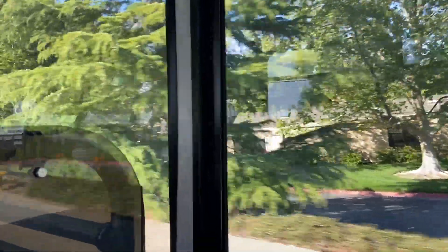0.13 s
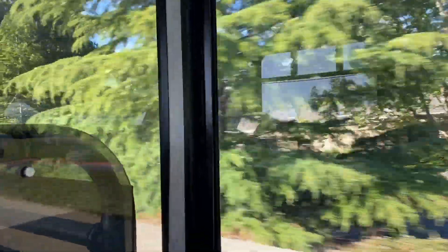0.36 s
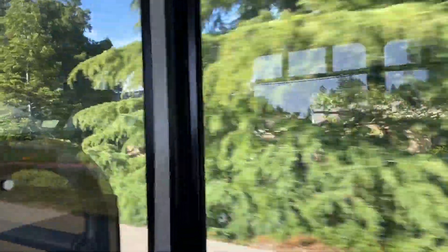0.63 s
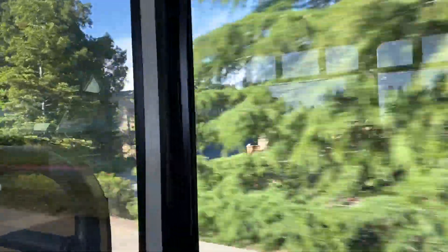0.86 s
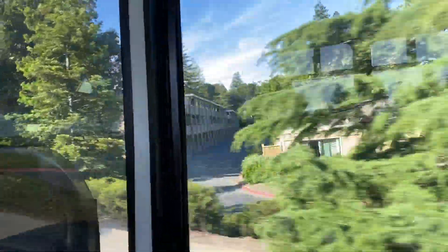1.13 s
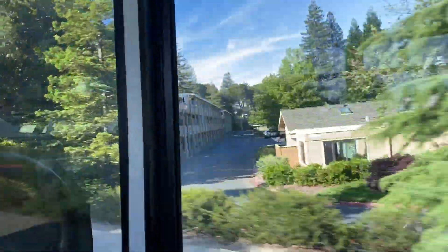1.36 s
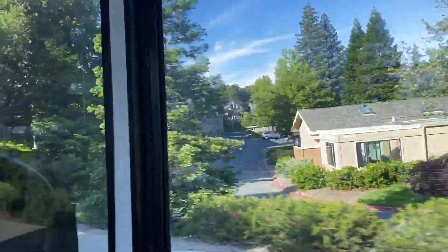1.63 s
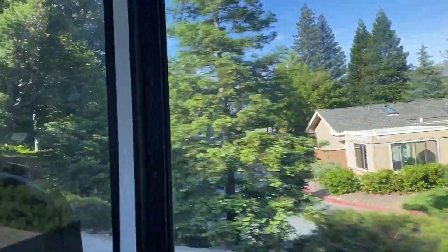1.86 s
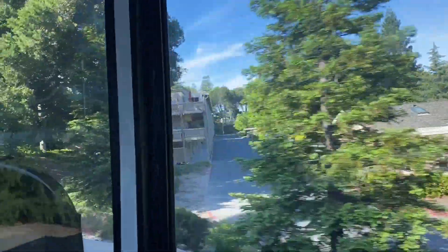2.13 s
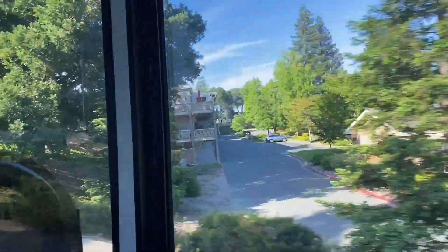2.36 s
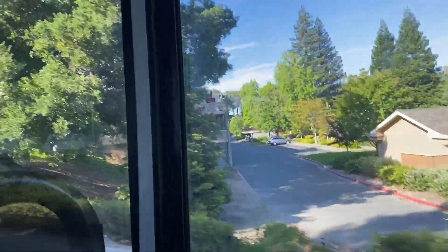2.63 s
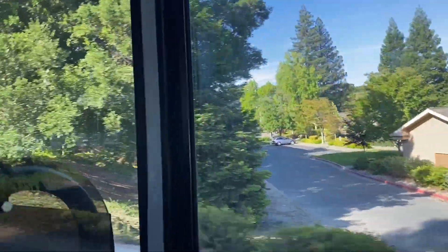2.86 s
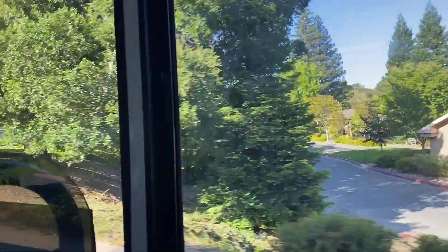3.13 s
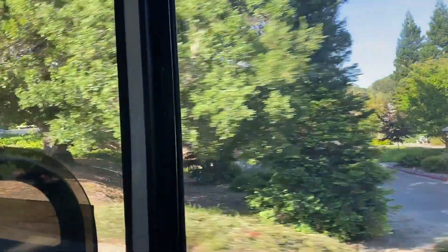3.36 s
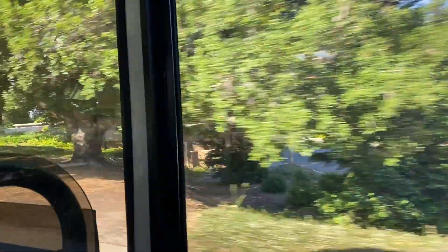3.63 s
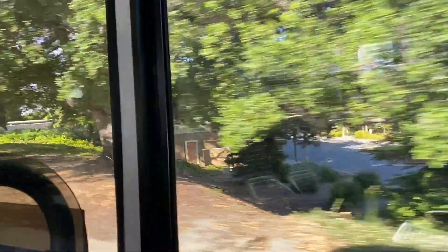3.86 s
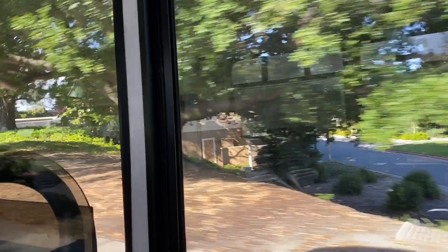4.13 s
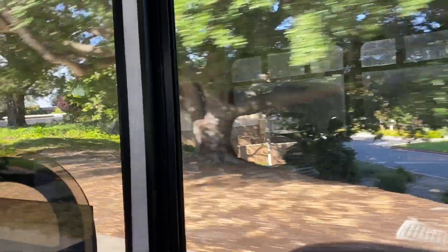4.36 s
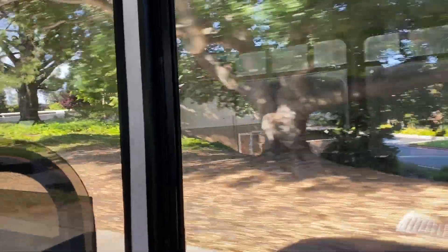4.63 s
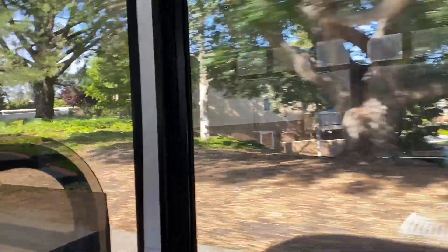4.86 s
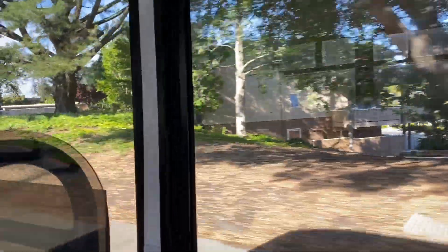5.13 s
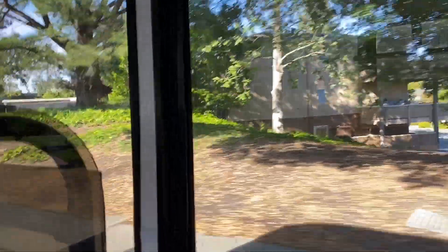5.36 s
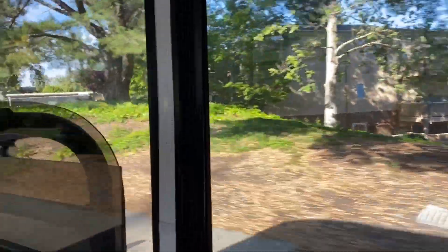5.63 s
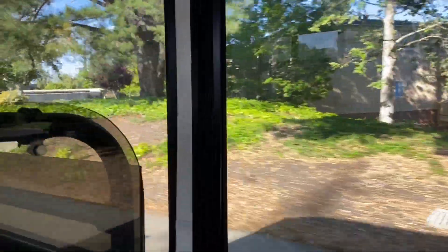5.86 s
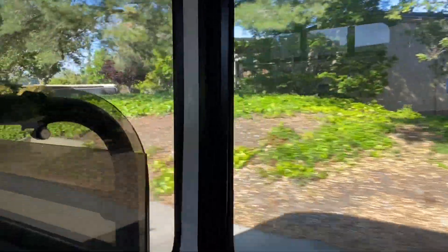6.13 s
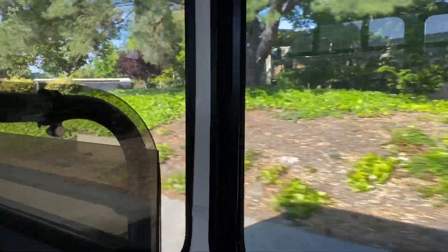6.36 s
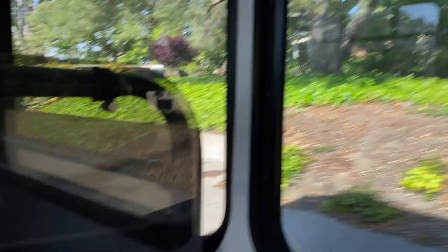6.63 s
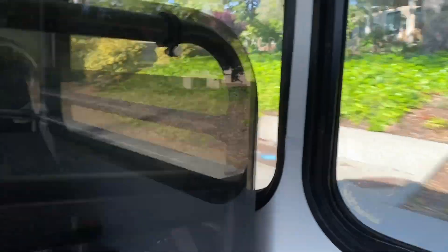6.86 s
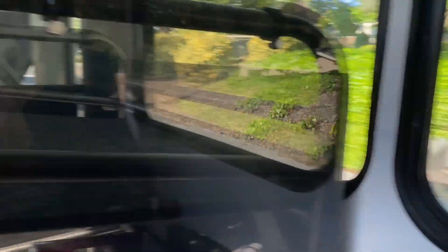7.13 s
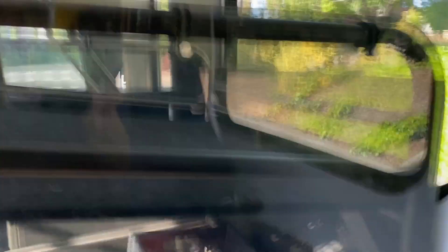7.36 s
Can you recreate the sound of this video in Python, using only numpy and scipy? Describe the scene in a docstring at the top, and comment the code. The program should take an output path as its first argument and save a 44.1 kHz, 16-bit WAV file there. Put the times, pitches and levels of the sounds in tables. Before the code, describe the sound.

Heard inside a small bus rolling slowly along a street. A low engine drone and bassy body boom dominate, with muffled tyre roar above. Loose panels rattle in a busy cluster between one and two seconds, then quieten. A hard latch clack strikes at about five seconds, followed by scattered knocks and ticks. Close stereo microphone in the cabin.

```python
"""Inside a small bus rolling slowly along a street.
The engine drones and the body shudders as wavering tones; shaped noise makes boom, growl and tyre roar.
Loose panels knock as dying noise with ringing modes; rail, bracket, latch and door ring when struck.
Latches tick in short high noise, and trim buzzes as clumped grains over hiss as the road shakes it.
A close pair of microphone ports hears it all, the right one sharing part of the left one's sound."""
import sys
import numpy as np
from scipy import signal
from scipy.fft import rfft, irfft
from scipy.io import wavfile

SR = 44100
rng = np.random.default_rng(int(sys.argv[2]) if len(sys.argv) > 2 else 0)


def level_to_linear(level):
    """Convert decibel levels to linear amplitude factors, elementwise."""
    exponent = np.asarray(level, float) / 20
    return 10 ** exponent


def log_audio(samples):
    """Write samples as a 16-bit WAV file to the path given in sys.argv[1]."""
    # one column per channel
    frames = np.atleast_2d(samples).T
    # limit to full scale, then quantise
    limited = np.clip(frames, -1, 1)
    pcm = np.round(limited * 32767).astype(np.int16)
    wavfile.write(sys.argv[1], SR, pcm)


N = 330309
HZ = np.fft.rfftfreq(N, 1 / SR)
TIME_S = np.arange(N) / SR

# how hard the trim is shaken: time_s [s], level_db [dB]
SHAKE_CURVE = [(0.0, -54.5), (0.42, -56.5), (0.6, -51), (0.95, -54.5), (1.14, -54.5), (1.175, -49),
               (1.27, -47), (1.96, -51), (2.2, -53), (3.36, -55), (3.9, -57), (4.51, -58), (4.75, -47.5),
               (5.25, -50.5), (6.01, -49), (6.3, -54.5), (6.65, -51), (6.99, -56), (7.2, -47.5),
               (7.49, -49.5)]
# spectrum of loose parts rattling: pitch_hz [Hz], density_db [dB per Hz, relative]
RATTLE_SPECTRUM = [(500, -8.5), (1000, -11.5), (2200, -1), (4000, -1.5), (7000, -6.5), (10000, -11),
                   (13000, -14.5), (15000, -14.5), (16500, -23.5)]
EDGE_ABOVE_HZ = 8000   # the hard top of buzz and knocks


def engine():
    """The firing tone booms in the cabin, with two faint overtones."""
    # drone, sagging unevenly, then rising at the end: time_s [s], firing_hz [Hz], level_db [dB]
    drone = [(1.3, 72.77, -30), (1.41, 73.3, -20.5), (1.6, 72.6, -20), (1.82, 68.9, -23.5),
             (2.12, 65.2, -16), (2.4, 66.6, -16.5), (2.77, 68.2, -22), (3.07, 65.33, -17.5),
             (3.33, 65.1, -16.5), (3.375, 65.3, -27), (3.42, 65.3, -16), (3.89, 65.42, -16.5),
             (4.41, 63.3, -17), (5.28, 62.0, -18.5), (5.95, 60, -20), (6.13, 58.25, -28), (6.4, 58.5, -28),
             (6.88, 59.16, -22.5), (7.08, 59.4, -19.5), (7.2, 59.7, -24.5), (7.4, 71, -29)]
    # overtones: multiple [of the firing tone], level_db [dB re the firing tone]
    overtones = [(2, -20), (3, -34.5)]
    return steady_tone(drone, overtones, waver_hz=0.3, waver_db=0.0)


def body_shudder():
    """A low shudder tone of the body, near 58 Hz, before and under the drone's start."""
    # shudder: time_s [s], pitch_hz [Hz], level_db [dB]
    shudder = [(0.75, 58.7, -34), (0.852, 59, -25), (0.882, 57.7, -43), (1.124, 57.6, -25.5),
               (1.374, 55.9, -41), (1.802, 61.2, -37), (1.95, 60.5, -30.5)]
    return steady_tone(shudder, [], waver_hz=0.97, waver_db=3.5)


def steady_tone(rows, overtones, waver_hz, waver_db):
    """A tone with overtones, its pitch and level drifting a little; it fades outside its table."""
    hz, level_db = in_time(rows)
    inside_s = np.minimum(TIME_S - rows[0][0], rows[-1][0] - TIME_S)
    fade = np.clip(inside_s / 0.035 + 1, 0, 1)
    phase = 2 * np.pi * np.cumsum(hz + waver_hz * drift(3.1)) / SR
    tone = np.sin(phase)
    for multiple, db in overtones:
        tone = tone + level_to_linear(db + 1.9 * drift(1.2)) * np.sin(multiple * phase)
    return np.sqrt(2) * fade * level_to_linear(level_db + waver_db * drift(1.4)) * tone


def road():
    """Bumps boom in the body's low modes; the floor pan growls and the tyres roar above."""
    # the suspension heaves: time_s [s], lowest_boom_db [dB]
    heave = [(0.0, -37), (0.54, -19.5), (0.9, -33.5), (1.58, -17.5), (1.77, -23), (1.94, -21), (2.61, -33),
             (3.4, -23.5), (4.2, -25.5), (4.45, -23.5), (5.4, -22), (5.9, -26.5), (7.3, -25.5)]
    # how hard the road works the body: time_s [s], upper_boom_db [dB]
    body_work = [(0.0, -23), (0.83, -21), (1.1, -25), (1.95, -20.5), (2.15, -24.5), (2.63, -23.5),
                 (3.3, -24), (3.75, -25), (4.75, -24), (5.13, -22.5), (5.92, -23.5), (6.65, -20.5),
                 (6.84, -26.5), (7.49, -22)]
    # rolling noise at mean shake, the roar quietening as the bus slows:
    # time_s [s], tyre_roar_db [dB], floor_pan_growl_db [dB]
    rolling = [(0, -39, -42), (0.5, -40, -42), (1.5, -41, -43), (2.6, -41.5, -43), (3.6, -41.5, -41.5),
               (4.5, -41.5, -40.5), (5.6, -43, -41.5), (6.5, -43, -41.5), (7.49, -44, -41)]
    # boom and roar spectra: pitch_hz [Hz], density_db [dB per Hz, relative]
    boom_spectrum = [(20, -23), (30, -4), (40, -9), (48, -1), (57, 1), (80, 3), (104, 0.5), (135, -6),
                     (170, -12), (215, -14.5), (300, -63)]
    roar_spectrum = [(100, -53), (180, -5.5), (250, -1.5), (320, -1.5), (450, -7.5), (700, -8.5),
                     (1200, -15.5), (2200, -20), (3500, -30.5), (7000, -38.5), (12000, -41.5), (16500, -57)]
    # resonances of the body: pitch_hz [Hz], half_width_hz [Hz], lift_db [dB]
    body_modes = [(35, 3.8, 7.5), (52.7, 9, 8.5), (65, 5, -2.5), (80.5, 3.3, 3.5), (96, 2.3, 4.5),
                  (106, 4.8, 4.5), (119, 4, -4), (132.3, 8, 5), (157.7, 7.4, 7.5), (169, 4, -3.5),
                  (185, 10, 3), (224, 5.6, 3), (236, 7.4, -2), (263, 6.4, 1.5), (297.8, 9.4, 4.5),
                  (390, 20, 2.5), (400, 12, -1.5), (449, 10, 4.5)]
    # the floor pan booms over dips in the road: centre_s [s], rise_db [dB]
    dips = [(1.15, 3), (1.5, 4), (2.0, 7), (5.0, 2), (5.4, 6), (5.92, 2.5), (6.65, 2), (7.1, 8),
            (7.27, 7.5), (7.49, 6)]
    dip_half_s = 0.053
    roar_follows, growl_follows = 0.35, 0.2   # shares of the shake's swing

    low_db, = in_time(heave)
    upper_db, = in_time(body_work)
    roar_db, growl_db = in_time(rolling)
    lift_db = sum(db / (1 + ((HZ - hz) / half_width) ** 2) for hz, half_width, db in body_modes)
    low, upper = split(coloured(rng.standard_normal((2, N)), at_hz(boom_spectrum) + lift_db), hz=62)
    growl, roar = split(coloured(rng.standard_normal((2, N)), at_hz(roar_spectrum) + lift_db), hz=363)
    boom = level_to_linear(low_db) * low + level_to_linear(upper_db + 0.83 * drift(3.1)) * upper

    dips_db = sum(db * np.exp(-((TIME_S - s) / dip_half_s) ** 2) for s, db in dips)
    growl_db = growl_db + growl_follows * shake_swing() + dips_db + 1.6 * drift(15.6)   # lumpy
    roar_db = roar_db + roar_follows * shake_swing() + 1.1 * drift(6.1)
    return boom + level_to_linear(growl_db) * rms_one(growl) + level_to_linear(roar_db) * rms_one(roar)


def knocks(chatter_per_s=1300):
    """A crack and a wash dying in the cabin; the panel chatters on, sounding its modes."""
    # loose panels knock: start_s [s], strike_db [dB], thud_db [weight, dB re strike],
    # decay_s [s to fall 60 dB, before the scaling of wash and chatter below]
    panel_knocks = [(0.399, -43.5, -1, 1), (0.8356, -46, -5, 0.2), (1.046, -34.5, -11, 0.36),
                    (1.1601, -36, 2, 0.73), (1.2098, -35.5, -5.5, 0.43), (1.234, -39, -1, 0.28),
                    (1.275, -44, -2, 0.26), (1.338, -39.5, 5.5, 0.33), (1.358, -42, 3, 0.25),
                    (1.413, -41.5, 11, 0.36), (1.4449, -39.5, 8.5, 0.37), (1.5709, -44, 5, 0.2),
                    (1.626, -47.5, 20.5, 0.38), (1.64, -35, -3, 0.45), (1.6465, -36, 3, 0.37),
                    (1.655, -34, 0.5, 0.48), (1.676, -44, -2, 0.37), (1.697, -52, -1, 0.4),
                    (1.8893, -36, 8, 0.47), (1.8943, -37, 4.5, 0.25), (1.907, -40, 7, 0.6),
                    (1.92, -46, 5, 0.34), (1.937, -46, 8, 0.4), (1.955, -46, 6, 0.4), (1.98, -48, 4, 0.3),
                    (2.039, -34.5, 1.5, 0.35), (2.056, -40, -2, 0.27), (2.088, -53, -1, 0.27),
                    (2.1755, -46, -20, 0.11), (2.3773, -43, 6, 0.4), (2.4835, -43.5, 5, 1),
                    (2.9117, -41, -1.5, 0.79), (3.447, -42.5, 2, 1), (4.007, -41.5, -2, 0.59),
                    (4.2544, -46.5, -9, 0.35), (4.475, -43.5, 1.5, 0.96), (4.607, -37, -2, 0.31),
                    (4.94, -38.5, 3, 0.36), (4.9958, -26.5, -10, 0.33), (5.011, -33.5, -0.5, 0.29),
                    (5.024, -49, -2, 0.4), (5.04, -44.5, 4, 0.5), (5.055, -49, 6, 0.3),
                    (5.085, -51, 3, 0.3), (5.105, -53, 4, 0.2), (5.1482, -41, 4.5, 0.33),
                    (5.243, -40, -6, 0.32), (5.469, -39.5, 1.5, 0.73), (5.727, -38.5, -14, 0.2),
                    (5.824, -46.5, -17, 0.38), (6.5934, -35, -0.5, 0.39), (6.615, -43, 4, 0.4),
                    (6.7509, -42, 1, 0.15), (6.951, -44, 5, 0.37), (6.9845, -43, -5, 0.463),
                    (7.045, -38.5, 3.5, 0.36), (7.2041, -43, -5, 0.51), (7.464, -44, 11.5, 0.3)]
    # panel resonances: pitch_hz [Hz], level_db [dB], t60_s [s]
    panel_modes = [(542, -1, 0.13), (861, 2.5, 0.067), (960, -9.5, 0.097), (1095, -3.5, 0.072),
                   (1140, -3.5, 0.047), (1765, 3, 0.039), (1990, -2.5, 0.042), (2320, 1.5, 0.045),
                   (2630, -3.5, 0.055), (3740, -12, 0.04), (4390, -6.5, 0.065), (5170, -4, 0.048),
                   (6370, -8, 0.03), (6900, -5, 0.032)]
    thud_below_hz, clatter_below_hz = 1400, 2900
    clatter_offset_db, clatter_follows = -6.5, 1   # middle band re strike; share of the weight
    edge_offset_db, edge_top_db = -16, -45.5   # hard edge re strike; its ceiling before the crack

    s, strike_db, thud_db, decay_s = np.transpose(panel_knocks)
    clatter_db = clatter_offset_db + clatter_follows * thud_db
    at = np.round(s * SR).astype(int)
    sputter = level_to_linear(1.5 * drift(120))   # the wash dies unevenly
    noise = coloured(sputter * rng.standard_normal((2, N)), at_hz(RATTLE_SPECTRUM))
    thud, noise = split(noise, thud_below_hz)
    clatter, noise = split(noise, clatter_below_hz)
    bright, edge = split(noise, EDGE_ABOVE_HZ)

    hardness_db = -.6 * thud_db   # blows with little thud are hard contacts and crack more

    def burst(level_db, crack_db, wash_db, smooth):
        """Crack plus wash; heavy parts take longer to swell."""
        crack = dying(at, level_to_linear(level_db + crack_db + hardness_db), .035 + 0 * s)
        wash = dying(at, level_to_linear(level_db + wash_db), 1.25 * decay_s)
        return signal.lfilter([smooth], [1, smooth - 1], crack + wash)

    out = burst(strike_db + thud_db, -28, -11.5, .006) * rms_one(thud)
    out += burst(strike_db + clatter_db, -10, -11, .03) * rms_one(clatter)
    out += burst(strike_db, -14.5, -12, .04) * rms_one(bright)
    edge_db = np.minimum(strike_db + edge_offset_db, edge_top_db)
    out += burst(edge_db, 0.82, 0, .1) * rms_one(edge)

    # chance touches after each blow drive the panel's modes
    touches = 0.52 * (rng.random(N) < chatter_per_s / SR)
    touches[at] = 0.16
    strengths_db = rng.normal(0, 2.5, (len(at), len(panel_modes)))
    for k, (hz, level_db, t60) in enumerate(panel_modes):
        part_db = thud_db if hz < thud_below_hz else clatter_db if hz < clatter_below_hz else 0
        force_db = strike_db + part_db + level_db - 13.5 + strengths_db[:, k]
        force = touches * dying(at, level_to_linear(force_db), 0.82 * decay_s)
        out += ring(force * rng.choice([-1, 1], (2, N)), hz, t60)
    return out


def fittings():
    """Thin lasting rail tones, hollow bracket taps, the hard clack of the latch, the door's thumps."""
    # blows: start_s [s], level_db [dB]; modes: pitch_hz [Hz], level_db [dB], t60_s [s]
    # a hand rail rings after some jolts
    rail_blows = [(1.645, -47), (1.899, -55)]
    rail_modes = [(3295, 0, .6), (3526, -5, .5)]
    # a bracket taps
    bracket_taps = [(1.2125, -35), (1.648, -34), (1.6535, -36), (2.04, -39), (7.468, -42), (7.478, -42)]
    bracket_modes = [(1814, 0, .04), (3640, -5, .03)]
    # the door latch clacks and bounces
    latch_clacks = [(4.9958, -36), (4.998, -38), (5.0005, -39), (5.013, -48), (5.022, -50), (5.043, -47),
                    (5.052, -50), (6.595, -48), (6.6, -51), (6.607, -51), (6.62, -52)]
    latch_modes = [(2260, 1, 0.03), (2837, -1, .022), (3300, -4, .018), (3700, -1, .022), (4040, -3, .02),
                   (4400, 2, 0.03), (5098, -3, .02), (5760, 0, .018), (6527, -2, .02), (7400, -5, .015)]
    # the door leaf thumps in its frame
    door_thumps = [(1.64, -41), (1.648, -39), (1.66, -41), (1.677, -43), (1.705, -44), (1.8895, -37),
                   (1.9, -39), (1.912, -40), (1.93, -41), (1.945, -42), (1.962, -42), (4.999, -36),
                   (5.008, -39), (5.021, -39), (5.032, -39)]
    door_modes = [(420, 1, 0.12), (572, -1, 0.044), (852, -5, 0.045), (996, 0.5, 0.059), (1064, -7, 0.033),
                  (2580, -7, 0.04)]
    rail = struck(rail_blows, rail_modes, spread_db=1)
    bracket = struck(bracket_taps, bracket_modes, spread_db=1.5)
    latch = struck(latch_clacks, latch_modes, spread_db=1)
    door = struck(door_thumps, door_modes, spread_db=1.5)
    return rail + bracket + latch + door


def struck(blows, modes, spread_db):
    """Each blow sets every mode of one object ringing, a little differently each time."""
    s, blow_db = np.transpose(blows)
    at = np.round(s * SR).astype(int)
    chance_db = spread_db * rng.standard_normal((len(s), len(modes)))
    out = 0
    for k, (hz, level_db, t60) in enumerate(modes):
        clicks = np.zeros(N)
        clicks[at] = level_to_linear(blow_db + level_db + chance_db[:, k]) * (-1) ** k
        out = out + ring(clicks, hz, t60)
    return out


def ticks():
    """Hard little contacts: milliseconds of high noise with a faint tail; shaking brings more of them."""
    # single latch ticks, loud to faint: start_s [s], level_db [dB]
    placed_ticks = [(0.3975, -49), (0.477, -38.5), (0.596, -40), (0.7118, -45), (0.8335, -43), (1.146, -42),
                    (1.214, -38), (1.3385, -46), (1.418, -47), (1.4446, -41), (1.519, -42), (1.765, -48),
                    (1.795, -43), (1.822, -39), (1.8956, -39), (2.0398, -42), (2.377, -46), (2.6702, -40.5),
                    (2.911, -43), (3.353, -43.5), (3.461, -41), (4.5939, -43), (4.6064, -35), (4.664, -48),
                    (4.758, -47), (4.8254, -44), (4.9944, -32.5), (5.1682, -43), (5.242, -43),
                    (5.3935, -51), (5.4663, -49), (5.609, -43), (5.692, -41), (5.7269, -47), (5.823, -53),
                    (5.911, -48), (5.9786, -61), (6.7506, -46), (6.78, -48), (6.9526, -47), (6.972, -52),
                    (7.0095, -45), (7.048, -43)]
    centre_hz, width_hz, t60_s = 12200, 6000, 0.01
    chance_per_s, chance_db, chance_spread_db = 6.0, -51, 2.0   # rate at mean shake

    s, level_db = np.transpose(placed_ticks)
    chance_at = np.flatnonzero(rng.random(N) < chance_per_s * level_to_linear(shake_swing()) / SR)
    at = np.append(np.round(s * SR).astype(int), chance_at)
    level_db = np.append(level_db, chance_db + chance_spread_db * rng.standard_normal(len(chance_at)))
    contact = dying(at, level_to_linear(level_db), t60_s + 0 * level_db)
    tail = dying(at, level_to_linear(level_db - 11.0), 0.15 + 0 * level_db)
    shape_db = -10 * np.log10(1 + ((HZ - centre_hz) / width_hz * 2) ** 4)
    return (contact + tail) * coloured(rng.standard_normal((2, N)), shape_db)


def buzz(per_s=900, spread_db=3.0):
    """Dense tiny contacts in clumps, over the hiss that the cabin smears them into."""
    level_db, = in_time(SHAKE_CURVE)
    sizzle_db = -66 + shake_swing()   # the top follows the whole swing of the shake
    clumps = level_to_linear(5.0 * drift(12.0))
    born = rng.random(N) < per_s * clumps / SR
    sizes = level_to_linear(spread_db * np.minimum(rng.exponential(1, N), 5))
    grains = signal.lfilter([1], [1, -.97], born * sizes)
    envelope = .5 * rms_one(grains) + level_to_linear(1.8 * drift(38.0))
    noise = coloured(envelope * rng.standard_normal((2, N)), at_hz(RATTLE_SPECTRUM))
    body, top = split(noise, EDGE_ABOVE_HZ)
    return level_to_linear(level_db) * body + level_to_linear(sizzle_db + 7.7 * drift(5.9)) * rms_one(top)


def shake_swing():
    """The shake in dB about its mean."""
    level_db, = in_time(SHAKE_CURVE)
    return level_db - level_db.mean()


def rms_one(x):
    """Scale to rms 1."""
    return x / np.sqrt(np.mean(x ** 2) + 1e-20)


def in_time(rows):
    """Columns of a curve table at every sample."""
    s, *columns = np.transpose(rows)
    return [np.interp(TIME_S, s, c) for c in columns]


def at_hz(points):
    """A spectrum table on the frequency grid, joined on a log axis."""
    hz, value = np.transpose(points)
    return np.interp(np.log(HZ + 1), np.log(hz), value)


def drift(rate_hz):
    """Slow chance with spread 1: noise through two equal low-pass poles, made at every 40th sample."""
    r = np.exp(-80 * np.pi * rate_hz / SR)
    noise = rng.standard_normal(N // 40 + 2002)
    slow = signal.lfilter([1], [1, -2 * r, r * r], noise)[2000:]   # drop the filter's start
    return np.interp(np.arange(N) / 40, np.arange(len(slow)), rms_one(slow))


def coloured(x, level_db):
    """Two signals through one spectrum; rms 1."""
    return rms_one(irfft(rfft(x) * level_to_linear(level_db), N))


def split(x, hz):
    """The parts below and above a frequency."""
    low = irfft(rfft(x) / (1 + (HZ / hz) ** 6), N)
    return low, x - low


def ring(clicks, hz, t60):
    """A unit click sets a sine of starting height 1 ringing in a two-pole resonator."""
    r, w = level_to_linear(-60 / (t60 * SR)), 2 * np.pi * hz / SR
    return signal.lfilter([0, np.sin(w)], [1, -2 * r * np.cos(w), r * r], clicks + 1e-18)


def dying(at, peaks, t60s):
    """An envelope that jumps at each sample index and dies away; overlapping powers add."""
    power = np.zeros(N)
    for start, peak, t60 in zip(at, peaks, t60s):
        age = np.arange(min(N - start, int(t60 * SR) + 1)) / SR
        power[start:start + len(age)] += peak ** 2 * level_to_linear(-120 * age / max(t60, .002))
    return np.sqrt(power)


def scene():
    """Row 0 is the left port; row 1 a second path: separate noise, the same struck fittings, no tones."""
    left_only = [[1], [0]]
    tones = (engine() + body_shudder()) * left_only
    return tones + road() + knocks() + fittings() + ticks() + buzz()


def low_pass(x):
    """Removes everything above the highest recorded frequency."""
    return signal.sosfilt(signal.butter(12, 16490, fs=SR, output="sos"), x)


def record(dry):
    """The right port shares part of the left one's sound, turned in phase; the rest is the second path."""
    # likeness of the ports: pitch_hz [Hz], likeness [0-1]
    likeness = [(25, .995), (90, 0.97), (135, 0.89), (170, 1), (215, 0.32), (270, 0.65), (345, 0.73),
                (550, 0.53), (750, 0.068), (1800, 0.031), (2600, 0.66), (5800, 0.32), (6900, 0.64),
                (8200, 1.0)]
    # level between the ports: pitch_hz [Hz], left_over_right_db [dB]
    tilt = [(25, -.5), (64, -1.1), (135, -2.2), (215, -.4), (320, 1.2), (440, -1), (560, 1.2), (1400, -.8),
            (3000, 1.5), (5000, 1.5), (7000, 0)]
    # phase between the ports, before the turn below: pitch_hz [Hz], right_leads_rad [radians]
    phase_lead = [(25, 0.38), (66, 0.17), (110, 0.24), (220, -0.2), (1000, -1.38), (4700, -0.55),
                  (6900, -0.22)]
    turn_from_hz, turn_every_hz = 6780, 4250   # above this the lead grows, one full turn per step
    staircase_rad = 0.11   # flattens the growing phase at each half turn

    near, other = rfft(dry) / (1 + (HZ / 15200) ** 60)   # steep top end
    alike = np.clip(at_hz(likeness), 0, 1)
    turn = 2 * np.pi * np.maximum(HZ - turn_from_hz, 0) / turn_every_hz
    lead = at_hz(phase_lead) + turn - staircase_rad * np.sin(2 * turn)
    right = alike * near * np.exp(1j * lead) + np.sqrt(1 - alike ** 2) * other
    half_tilt = np.sqrt(level_to_linear(at_hz(tilt)))
    ports = irfft(np.array([near * half_tilt, right / half_tilt]), N)
    return low_pass(ports)


dry = scene()
out = record(dry)
log_audio(out)
```